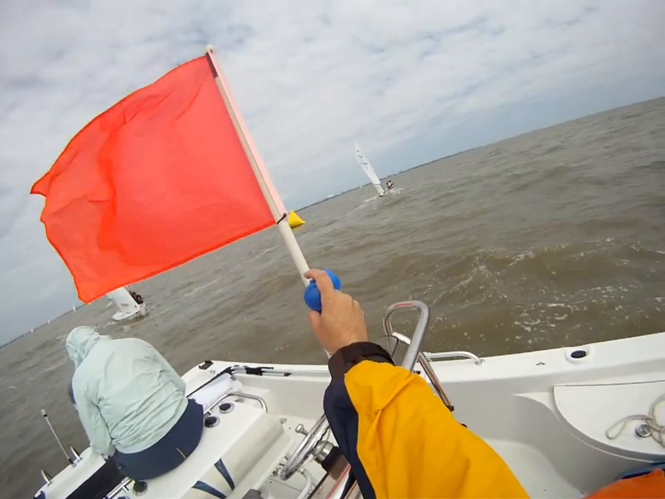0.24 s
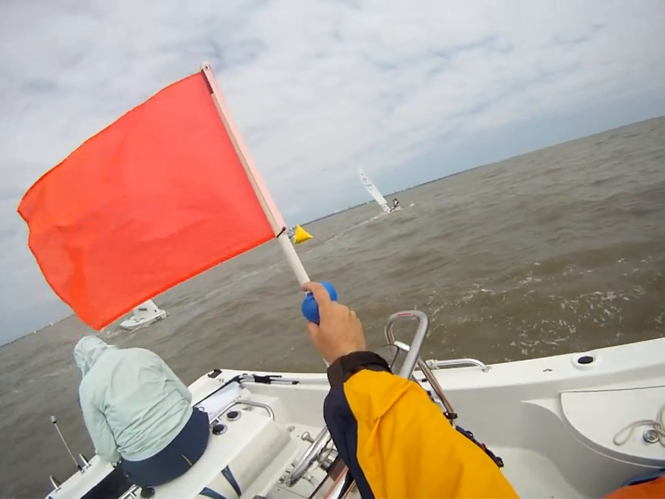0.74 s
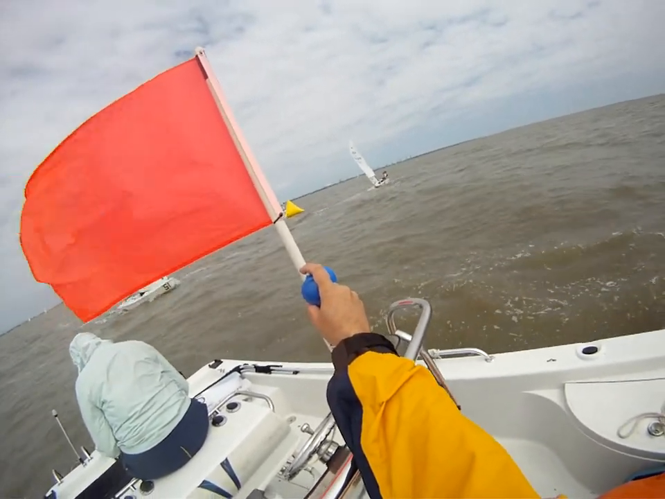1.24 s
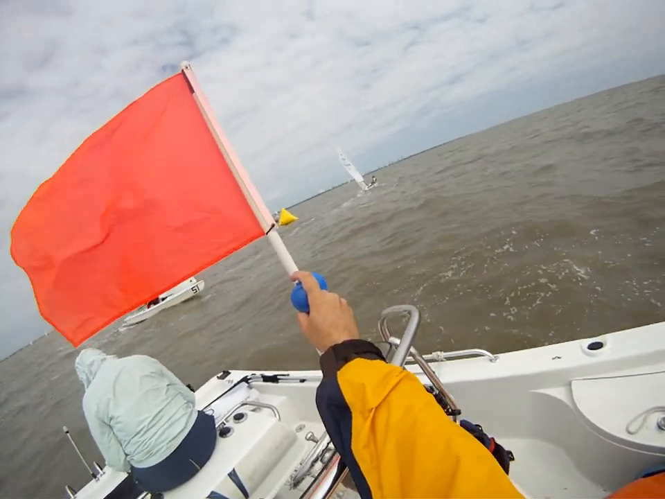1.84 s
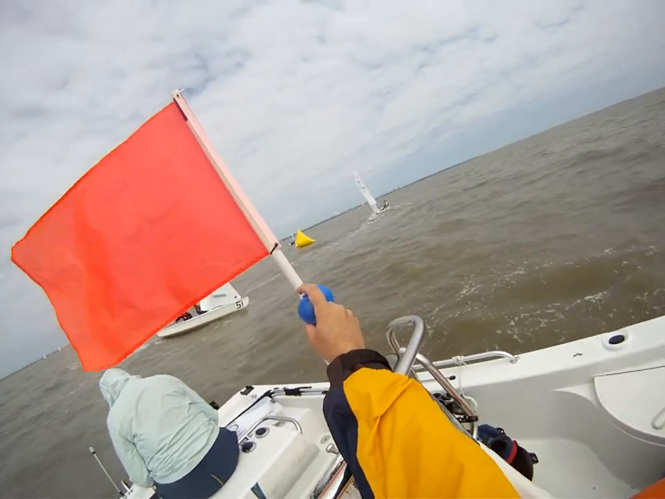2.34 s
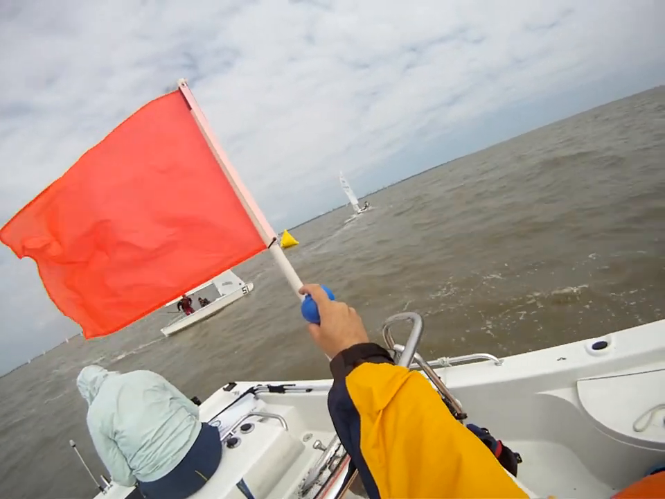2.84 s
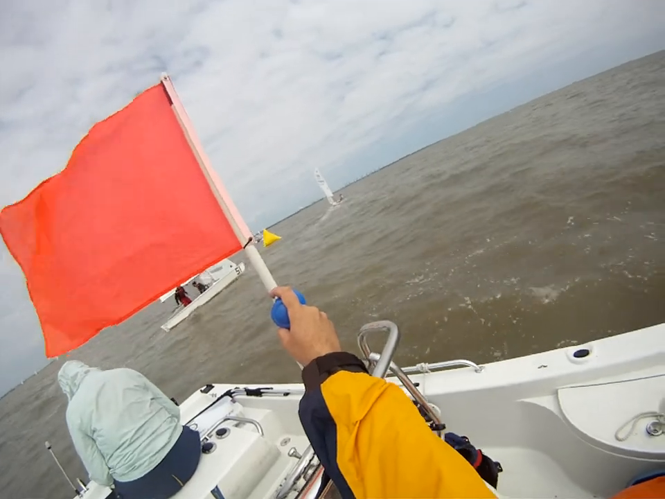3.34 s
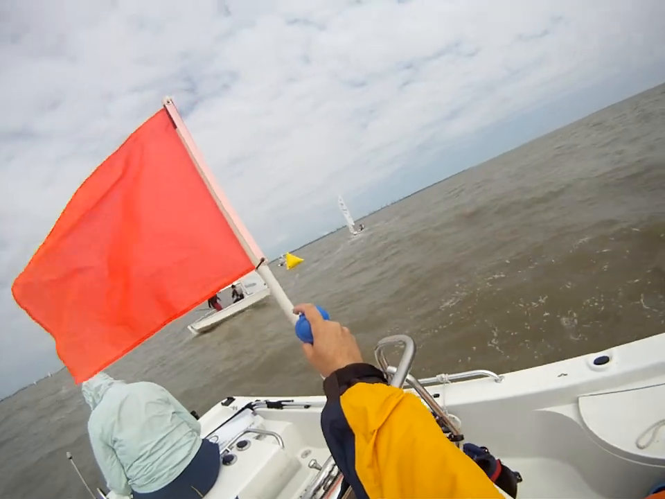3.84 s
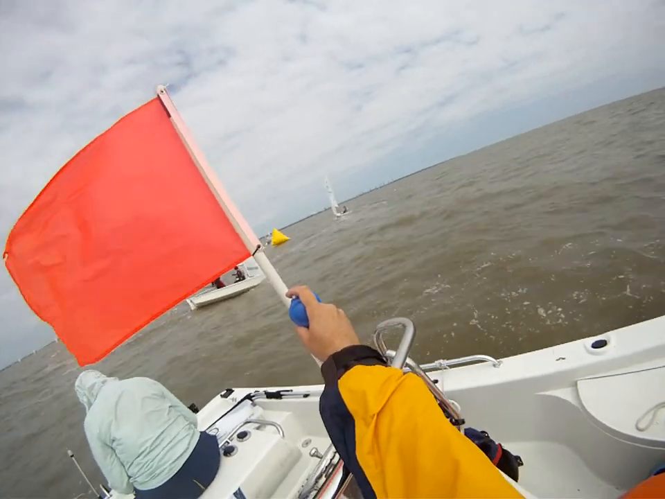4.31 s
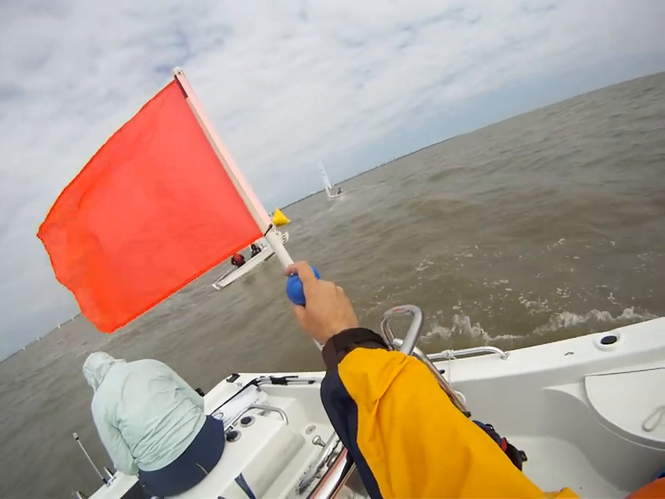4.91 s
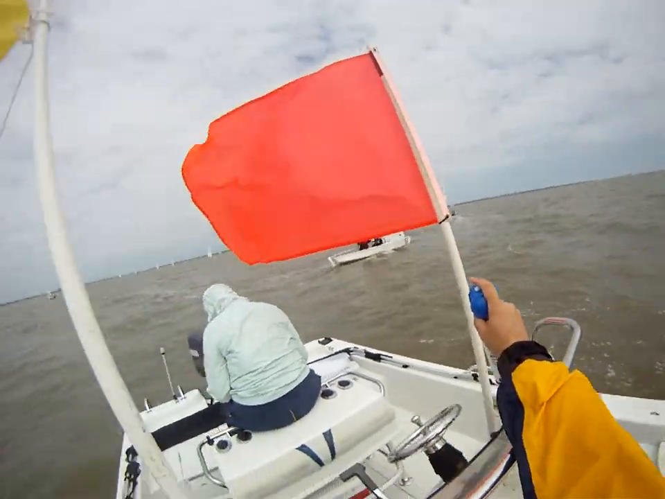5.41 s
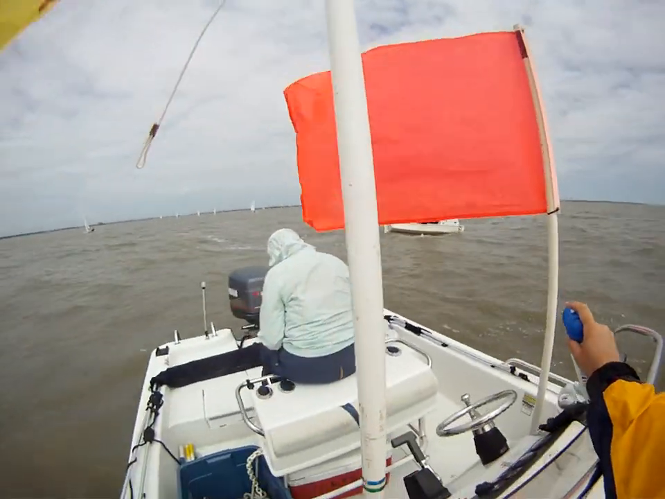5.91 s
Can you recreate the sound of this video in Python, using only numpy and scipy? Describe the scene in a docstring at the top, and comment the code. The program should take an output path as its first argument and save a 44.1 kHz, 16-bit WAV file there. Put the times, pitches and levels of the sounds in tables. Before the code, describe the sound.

Wind buffets an enclosed camera microphone in low, lumpy gusts while nearby cloth rustles, crackles and snaps. After more than four seconds there are two quiet thuds on board, then a sudden, very loud canned air horn blast of about a third of a second, swooping down and holding a buzzy note. It stops quickly, with a short scatter off the deck and a faint distant reflection; flag and wind continue.

```python
"""On an open boat, a canned air horn gives one short blast. Its note drops into pitch, holds and dies away.
The horn is a sum of overtones plus hissing gas; deck and seats scatter it, and a hull nearby echoes it faintly.
A flag rustles and snaps (shaped noise), something knocks dully on board, and wind rumbles on a camera housing.
The camera samples slowly and holds each sample, so every sound has mirror images in the treble."""
import sys
import numpy as np
from scipy import signal
from scipy.fft import rfft, irfft, next_fast_len
from scipy.io import wavfile
from scipy.ndimage import map_coordinates

SR = 44100
rng = np.random.default_rng(int(sys.argv[2]) if len(sys.argv) > 2 else 0)


def inscribe(sig):
    """Save sig as 16-bit PCM at rate SR to the path in sys.argv[1].

    A 1-D sig is mono; a 2-D sig holds one channel per row.
    Samples are clipped to [-1, 1] before scaling.
    """
    pcm = np.round(np.clip(np.atleast_2d(sig).T, -1, 1) * 32767)
    wavfile.write(sys.argv[1], SR, pcm.astype(np.int16))


N = 271656  # length of the scene in samples


def amp(db):
    """Turn decibels into a plain multiplier."""
    return 10 ** (np.asarray(db) / 20)


def unit(x):
    """Scale a sound to an average (RMS) strength of one."""
    return x / np.sqrt(np.mean(x ** 2) + 1e-20)


def along(points, hz):
    """Read a (frequency, value) table at any frequency, on a log axis."""
    f, v = np.transpose(points)
    return np.interp(np.log(hz + 1), np.log(f + 1), v)


def curves(rows):
    """Give one value per sample for each column after the time."""
    s, *cols = np.transpose(rows)
    return [np.interp(np.arange(N) / SR, s, c) for c in cols]


def wobble(rate):
    """A smooth random curve with `rate` random points a second."""
    points = rng.standard_normal(int(N * rate / SR) + 4)
    return map_coordinates(points, [np.arange(N) * rate / SR])


def filtered(x, response):
    """Multiply the spectrum of x by a response (a function of frequency)."""
    m = 2 * next_fast_len(x.shape[-1] // 2 + 4096)
    spectrum = rfft(x, m) * response(np.fft.rfftfreq(m, 1 / SR))
    return irfft(spectrum, m)[..., :x.shape[-1]]


# How the trumpet sends out the overtones of the diaphragm: f/Hz, level/dB
TRUMPET_COLOUR = [(504, 2), (1008, 1.5), (1512, -1.5), (2016, -1.5), (2520, 3.5), (3024, -1.5), (3528, 0.5),
                  (4032, 9.5), (4536, 4.5), (5040, 6), (5545, -1), (6048, 4), (6550, -28), (7500, -7)]
# Bands of overtones that weaken until the valve shuts: start t/s, full t/s, centre f/Hz, width f/Hz, level/dB
OVERTONE_DIPS = [(4.83, 4.856, 4610, 400, -12.5), (4.82, 4.88, 3570, 300, -2.5),
                 (4.95, 4.994, 3720, 420, -9)]
# Strength of the echo from the hull: t/s, level/dB
HULL_ECHO = [(4.8, -48), (5.065, -46), (5.082, -27), (5.105, -28.5), (5.125, -34)]
# Colour of that echo: f/Hz, level/dB
ECHO_COLOUR = [(400, -13), (1000, -9), (2000, -2.5), (2520, -20), (3000, 0.5), (3530, 0), (4030, 5),
               (5000, -2.5)]
UNSETTLED = 31  # the further off its note, the more unevenly the diaphragm beats


def horn():
    """The diaphragm chops the gas stream into pulses; as pressure falls the overtones go first."""
    pitch_hz, level_db, dark_db, gas = valve()
    drift = 1 + 0.00032 * wobble(60)
    turn = 2 * np.pi * np.cumsum(pitch_hz * drift) / SR

    on = slice(round(VALVE_OPEN_S * SR), round((VALVE_SHUT_S + .2) * SR))
    t = np.arange(N)[on] / SR
    k = np.arange(1, 16)[:, None]  # overtone numbers, the note itself being 1
    hz = k * pitch_hz[on]

    shade_db = 0
    for start, full, centre, width, db in OVERTONE_DIPS:
        times = [start, full, VALVE_SHUT_S - SHUT_S, VALVE_SHUT_S + SHUT_S]
        depth_db = np.interp(t, times, [0, db, db, 0])
        shade_db = shade_db + depth_db * np.exp(-((hz - centre) / width) ** 2)

    # wind between horn and microphone shakes the high overtones most
    rough = 1 + UNSETTLED * abs(pitch_hz[on] / NOTE_HZ - 1)
    shakes_db = [0.16 * wobble(40)[on] + 0.062 * rough * wobble(250)[on] for _ in k]
    shimmer_db = k * np.array(shakes_db)

    size = amp(along(TRUMPET_COLOUR, hz) - dark_db[on] * np.log2(k) + shade_db + shimmer_db)
    # the flare spreads each pulse in time: overtones leave one after another
    tone = np.sum(size * np.cos(k * turn[on] + .45 * k ** 2), axis=0)

    jet = filtered(rng.standard_normal(N), lambda f: 1j * f / (1800 + 1j * f))
    # the hiss comes in puffs, one for each opening of the diaphragm
    direct = gas * jet * (1 + np.cos(turn))
    direct[on] -= amp(level_db[on]) * tone

    far = filtered(direct, lambda f: amp(along(ECHO_COLOUR, f)))
    far = np.roll(far, round(.095 * SR))  # the way to the hull and back, in seconds
    echo = amp(curves(HULL_ECHO)[0] + 1.8 * wobble(27.03)) * far
    return direct + cockpit(direct) + echo


# The note, before the fade takes over: t/s, level/dB, darkening/dB per octave
NOTE_PRESSURE = [(4.728, -63, 10), (4.736, -20, 8.5), (4.744, -5.5, 9), (4.75, -2.5, 2.5), (4.755, 2, 4.5),
                 (4.761, -8, 2), (4.772, -4.5, 2), (4.81, -7, .5), (4.86, -5.5, 2), (4.94, -4, 2.5),
                 (5.023, -4, 2.5)]
VALVE_OPEN_S, VALVE_SHUT_S = 4.728, 5.023
# the pitch starts high and settles towards the note, with a slower last part (the sag)
START_HZ, NOTE_HZ, EXCESS_HZ, SETTLE_S = 792, 502.5, 472.5, .02
SAG_HZ, SAG_S = 19.7, .08
# the pitch kicks up just before the valve shuts, then creeps up as the note fades
SHUT_JUMP_HZ, JUMP_LEAD_S, RISE_HZ_PER_DB = 12.8, 0.0052, 1.2
SHUT_DROP_DB, SHUT_S = 4, 0.0067  # first quick loss as the valve closes
FADE_DB_PER_S, FADE_DB_PER_S2 = 177, 1300  # the fade gathers speed
DARK_PER_DB = 0.95  # dB per octave for each dB of fading
# hiss of the gas: a burst before the note settles, then steady, with a swell as the valve closes
GAS_PEAK_S, GAS_PEAK_DB, GAS_HOLD_DB, GAS_PUFF_DB = 4.749, -5.5, -32.5, 5
GAS_RISE_DB_PER_S, GAS_FALL_DB_PER_S, GAS_FADE_DB_PER_S = 1301.5, 480, 450


def valve():
    """Pitch, level, darkening and hiss follow the pressure behind the diaphragm."""
    t = np.arange(N) / SR
    opened = np.maximum(t - VALVE_OPEN_S, 0)
    shut = np.maximum(t - VALVE_SHUT_S, 0)
    closing = np.tanh(shut / SHUT_S)
    fade_db = FADE_DB_PER_S * shut + FADE_DB_PER_S2 * shut ** 2 + SHUT_DROP_DB * closing

    sag_hz = SAG_HZ * np.exp(-opened / SAG_S)
    settling_hz = NOTE_HZ + EXCESS_HZ * np.exp(-opened / SETTLE_S) + sag_hz
    jump_hz = SHUT_JUMP_HZ * np.clip((t - VALVE_SHUT_S) / JUMP_LEAD_S + 1, 0, 1)
    pitch_hz = np.minimum(settling_hz, START_HZ) + jump_hz + RISE_HZ_PER_DB * fade_db

    level_db, dark_db = curves(NOTE_PRESSURE)
    late = t - GAS_PEAK_S
    burst_db = GAS_PEAK_DB + np.minimum(GAS_RISE_DB_PER_S * late, -GAS_FALL_DB_PER_S * late)
    steady_db = GAS_HOLD_DB + GAS_PUFF_DB * closing - GAS_FADE_DB_PER_S * shut
    gas = amp(burst_db) + (late > 0) * amp(steady_db)
    return pitch_hz, level_db - fade_db, dark_db + DARK_PER_DB * fade_db, gas


def cockpit(x, level_db=-22, t60=0.12):
    """Deck, seats and rails throw back a short scatter of reflections (t60: seconds to fall 60 dB)."""
    t = np.arange(SR // 8) / SR
    tail = rng.standard_normal(len(t)) * amp(-60 * t / t60) * (t > .002)
    return amp(level_db) * signal.fftconvolve(x, tail / np.linalg.norm(tail))[:N]


# Walls and air of the camera housing: f/Hz, level/dB
HOUSING_COLOUR = [(300, -15.5), (900, -13.5), (1130, -5.5), (1480, -11.5), (1780, -8), (2080, 3),
                  (2650, -5), (2830, -10), (2970, -7), (3170, -16), (3760, -2.5), (4250, -22),
                  (4680, -22.5), (4870, -16)]


def housing(x):
    """Walls and air colour sound on its way in; folding the cepstrum makes the colour ring after the sound."""
    def response(f):
        cepstrum = irfft(np.log(amp(along(HOUSING_COLOUR, f))))
        cepstrum[1:len(f) - 1] *= 2
        cepstrum[len(f):] = 0
        size = 2 * len(f) - 1 - (len(cepstrum) % 2 == 0)
        return np.exp(rfft(cepstrum, size))[:len(f)]
    return filtered(x, response)


# Cloth snaps: t/s, peak level/dB, tilt/dB per octave (kept within -6 to 4 when played)
CLOTH_SNAPS = [(.043, -38, -4.5), (.138, -33.5, 4), (.197, -38, -1), (.673, -33, -3.5), (.78, -38, 0),
               (.877, -33, -7.5), (.908, -41, -5), (.942, -35, -2.5), (1.157, -36.5, -0.5),
               (1.434, -37.5, -6), (1.705, -35.5, -3), (2.018, -37, -6), (2.074, -33.5, -6),
               (2.215, -30, 1.5), (2.445, -31.5, 2), (2.587, -34, 0.5), (2.919, -28.5, -2),
               (3.026, -32.5, -5), (3.126, -32.5, -5.5), (3.376, -28.5, 4), (3.689, -28.5, -5),
               (3.731, -36, 1), (3.898, -34, 3), (4.155, -33.5, 0), (4.185, -35, 2), (4.69, -36, -1),
               (5.254, -33.5, 1.5), (5.307, -35.5, 3), (5.338, -35.5, 1), (5.491, -33.5, 1.5),
               (5.585, -30.5, 0.5), (5.771, -36.5, 1), (5.972, -37, 2), (6.095, -30, 4), (6.101, -23.5, 4)]
# Dull knocks on board: t/s, level/dB, f/Hz, time to fall 60 dB/s
BOARD_KNOCKS = [(4.466, -41.5, 397, 0.057), (4.623, -43, 277, 0.048)]
SNAP_RISE_S, SNAP_T60_S = 0.0017, .022


def snaps():
    """Each snap is a quick rise and a short puff of noise; each knock is one damped tone."""
    out = np.zeros(N + SR)
    t = np.arange(SR // 16) / SR
    for s, db, tilt_db in CLOTH_SNAPS:
        rise = (1 - np.exp(-t / SNAP_RISE_S)) ** 2
        puff = rng.standard_normal(len(t)) * amp(-60 * t / SNAP_T60_S) * rise
        puff[44:47] += .9  # a tiny click 1 ms into the puff
        slope = np.clip(tilt_db, -6, 4) / 6

        def tilt(f):
            low_cut = 1j * f / (400 + 1j * f)
            return (1j * (f + 300) / 2200) ** slope * low_cut

        heard = housing(filtered(puff, tilt))
        out[round(s * SR) - 30:][:len(t)] += amp(db) * heard / np.max(abs(heard))
    for s, db, hz, t60 in BOARD_KNOCKS:
        swell = amp(db - 60 * t / t60) * (1 - np.exp(-t / 0.0017))
        out[round(s * SR):][:len(t)] += swell * np.sin(2 * np.pi * hz * t)
    return out[:N]


# Strength of the flag: t/s, rustle level/dB, fizz level over the rustle/dB
FLAG_WIND = [(0, -54, -10.5), (.6, -53.5, -14.5), (.9, -52.5, -15), (1.5, -55.5, -10.5), (2.05, -50.5, -10),
             (2.3, -50.5, -8), (2.55, -49.5, -5), (2.8, -50.5, -6.5), (3.05, -52, -14), (3.5, -54, -9.5),
             (3.75, -51, -13.5), (4.2, -49, -10.5), (4.62, -53.5, -14), (5.18, -54.5, -8), (5.5, -55, -8.5),
             (5.75, -52.5, -15), (6.16, -54, -11)]
# Colour of the rustle outside the housing: f/Hz, level/dB per Hz
RUSTLE_COLOUR = [(80, -8), (180, 11), (350, 6), (1000, 1), (3000, -6), (4000, -4.5), (4500, -8),
                 (8000, -50)]
# Colour of the fizz outside the housing: f/Hz, level/dB per Hz
FIZZ_COLOUR = [(3000, -43), (4000, -17.5), (4430, 4), (4680, -4), (5000, -2), (8000, -11)]


def flag():
    """Cloth rustle: hiss that flutters, with small crackles on it, and a fizz that comes and goes."""
    rustle_db, fizz_db = curves(FLAG_WIND)
    flutter = amp(0.27 * wobble(9) + 1.06 * wobble(20) + 0.51 * wobble(49))

    # 700 crackles at random times: many small, few big
    chance = rng.random((700, 2))
    places = (chance[:, 0] * N).astype(int)
    kicks = np.bincount(places, amp(-3.5 * np.log(chance[:, 1] + 0.019)), N)
    crackle_shape = np.exp(-abs(np.arange(-600, 601)) / (0.0013 * SR))
    crackle = signal.fftconvolve(kicks, crackle_shape, "same")

    cloth = rng.standard_normal((2, N)) * (flutter + 0.27 * crackle)
    coloured = filtered(cloth, lambda f: amp([along(RUSTLE_COLOUR, f), along(FIZZ_COLOUR, f)]))
    body, fizz = housing(coloured)
    return amp(rustle_db) * (unit(body) + amp(fizz_db) * unit(fizz))


# Strength of the wind on the housing: t/s, rumble level/dB
WIND_GUSTS = [(0.0, -50.5), (0.68, -53), (0.72, -48.5), (2.09, -52), (2.28, -57.5), (2.88, -49.5),
              (2.9, -55), (3.34, -47.5), (3.46, -57.5), (3.55, -44.5), (3.93, -51.5), (4.24, -47.5),
              (4.82, -52), (4.84, -41), (4.99, -52), (5.13, -44), (5.16, -63), (5.2, -52), (5.44, -44.5),
              (5.78, -50.5), (5.82, -39), (5.95, -53), (6.04, -42.5), (6.16, -49.5)]
# Colour of the rumble: f/Hz, level/dB per Hz
RUMBLE_COLOUR = [(8.8, -49), (15, -19.5), (43, -3), (56, -2), (200, -23), (260, -32), (440, -120)]


def rumble():
    """Gusts push on the housing walls in lumps, heard as low noise that swells and sinks."""
    push = filtered(rng.standard_normal(N), lambda f: amp(along(RUMBLE_COLOUR, f)))
    lumps = amp(1.64 * wobble(15) + 1.5 * wobble(4.96))
    return amp(curves(WIND_GUSTS)[0]) * unit(lumps * push)


def scene():
    """Add all the sources; a fainter second rumble, opposite in the two channels, gives width."""
    mono = housing(horn()) + snaps() + flag() + rumble()
    side = amp(-20) * rumble()
    return np.array([mono + side, mono - side])


def levelled(x, knee_db=-30, squeeze=0.28):
    """Gain control: the gain follows the recent power and gives way above the knee."""
    keep = np.exp(-1 / (.016 * SR))  # a memory of 16 ms
    power = signal.lfilter([1 - keep], [1, -keep], np.mean(x, axis=0) ** 2)
    return x * (1 + power / amp(2 * knee_db)) ** (-squeeze / 2)


# The filter before the sampler: f/Hz, level/dB (nothing passes above the last row)
SAMPLER_GUARD = [(4900, 1.5), (5500, -4), (6000, -12.5), (7000, -25), (8000, -47)]
SAMPLE_HZ, REPEATS = 12000, 4  # the slow sample rate; each sample is repeated this many times
TOP_HZ = 15350  # steep upper limit of the sound


def record(dry):
    """Slow sampling mirrors the sound about the sample rate; holding each sample dulls the mirrors."""
    def guard(f):
        return amp(along(SAMPLER_GUARD, f)) * (f < SAMPLER_GUARD[-1][0])

    def hold(f):
        held = np.sinc(f / SAMPLE_HZ) / np.sinc(f / (REPEATS * SAMPLE_HZ))
        return held / (1 + (f / TOP_HZ) ** 400)

    band = filtered(levelled(dry), guard)
    sampled = band * (1 + 2 * np.cos(2 * np.pi * SAMPLE_HZ * np.arange(N) / SR))
    return filtered(sampled, hold)


dry = scene()
out = record(dry)
inscribe(out)
```